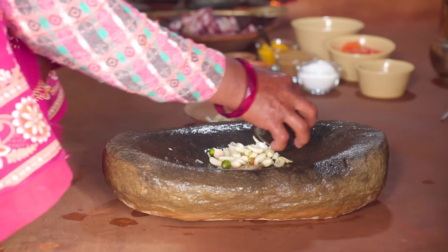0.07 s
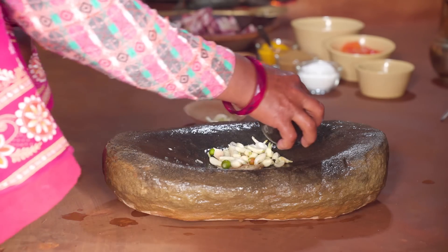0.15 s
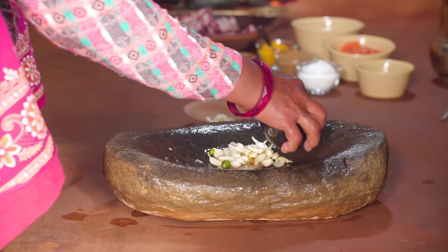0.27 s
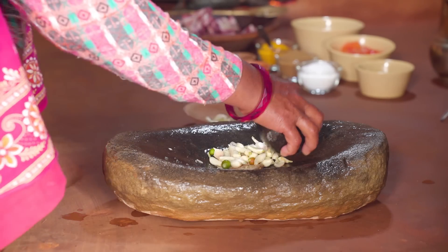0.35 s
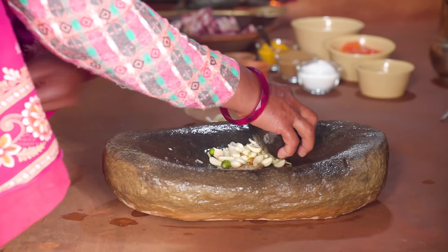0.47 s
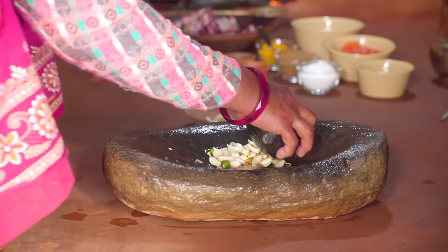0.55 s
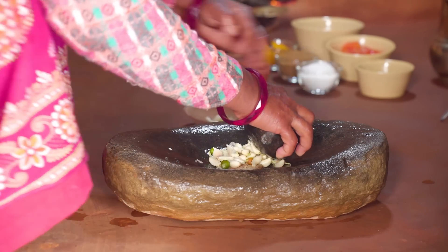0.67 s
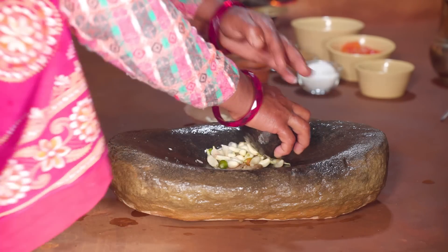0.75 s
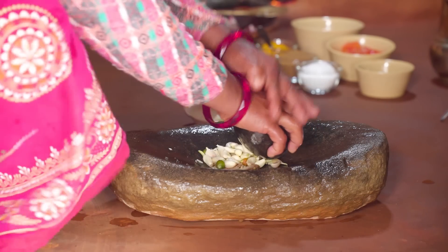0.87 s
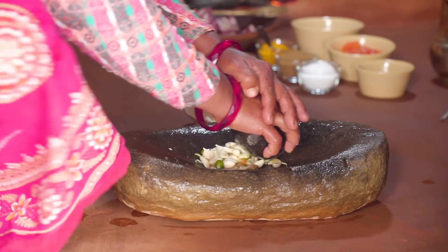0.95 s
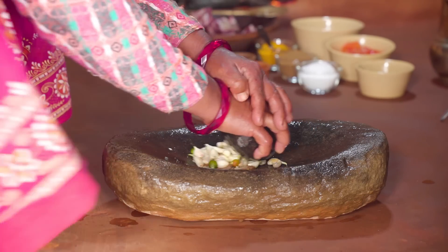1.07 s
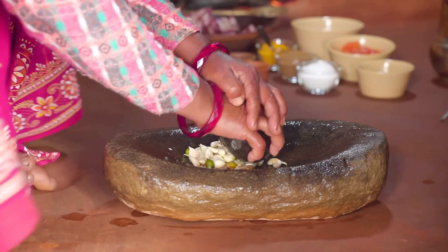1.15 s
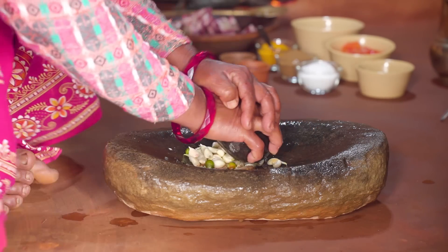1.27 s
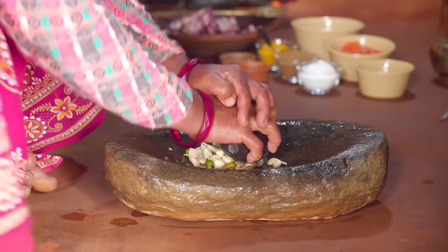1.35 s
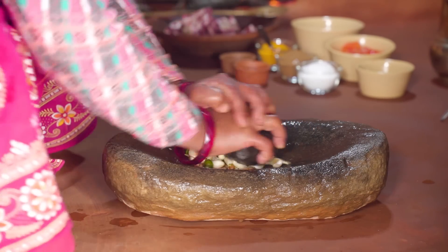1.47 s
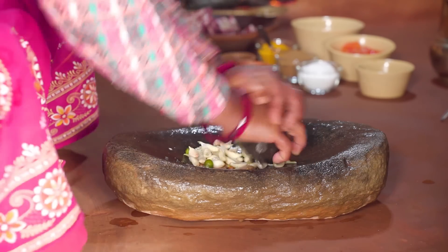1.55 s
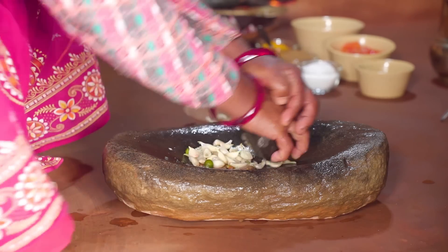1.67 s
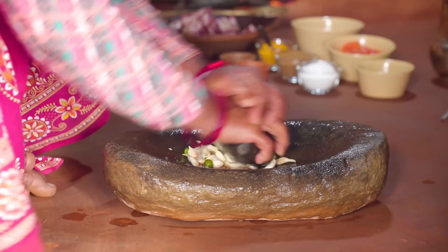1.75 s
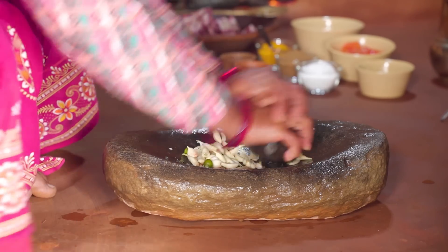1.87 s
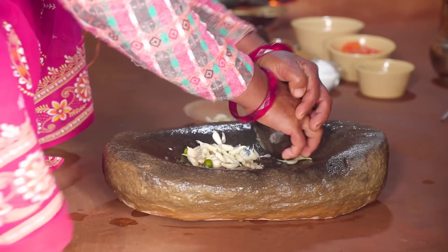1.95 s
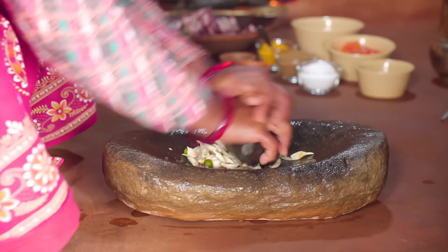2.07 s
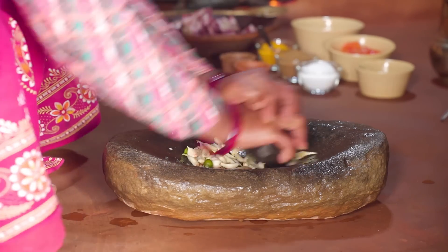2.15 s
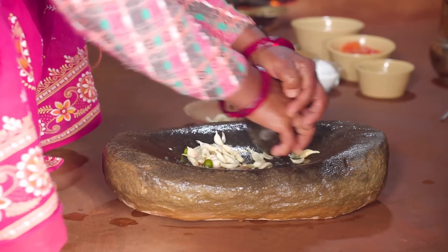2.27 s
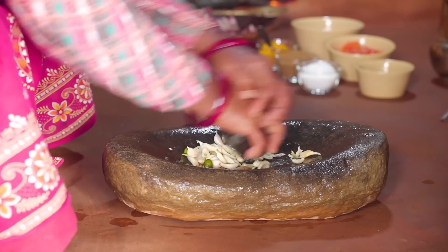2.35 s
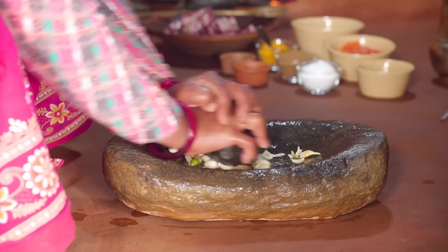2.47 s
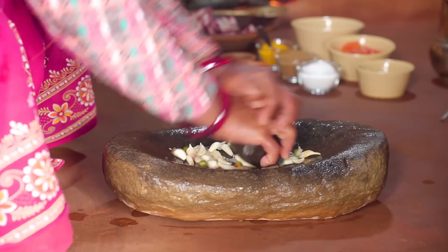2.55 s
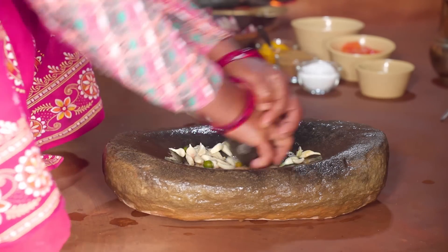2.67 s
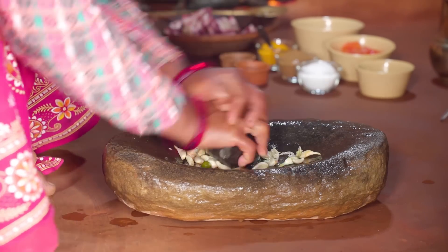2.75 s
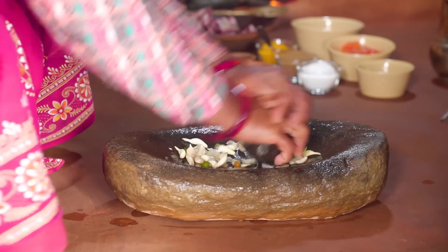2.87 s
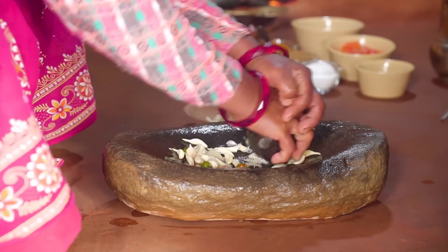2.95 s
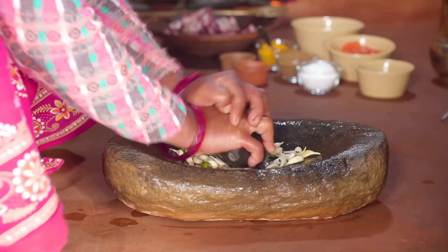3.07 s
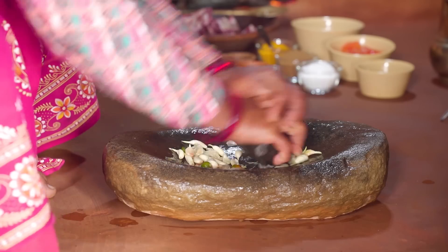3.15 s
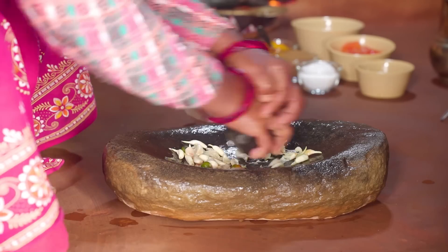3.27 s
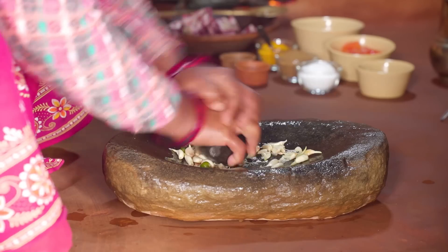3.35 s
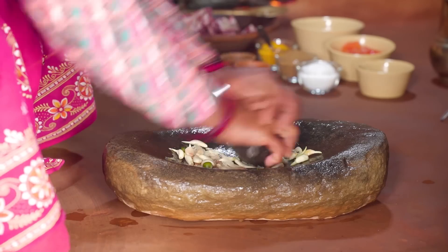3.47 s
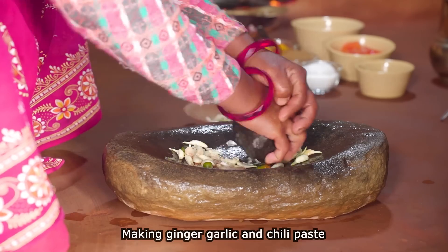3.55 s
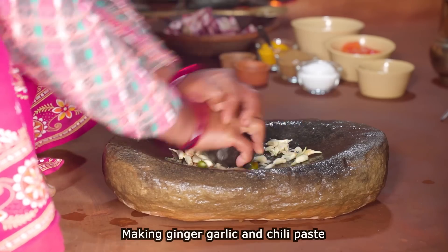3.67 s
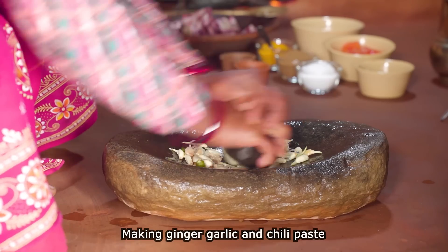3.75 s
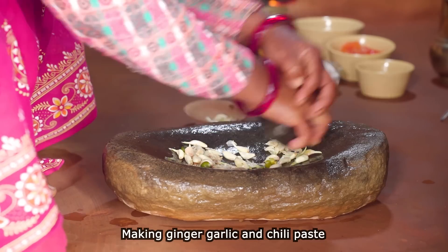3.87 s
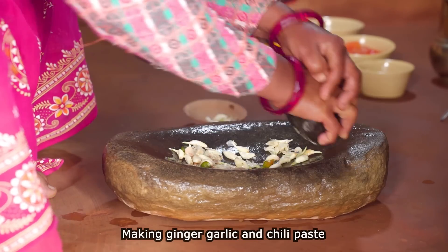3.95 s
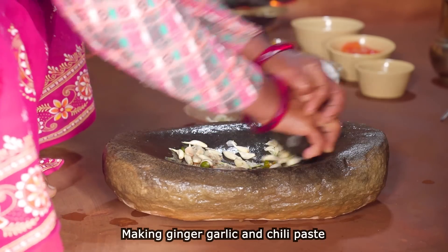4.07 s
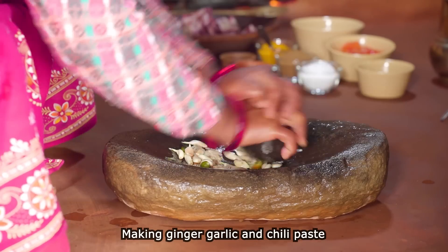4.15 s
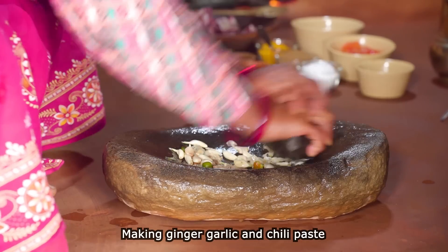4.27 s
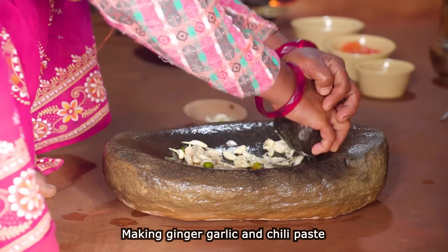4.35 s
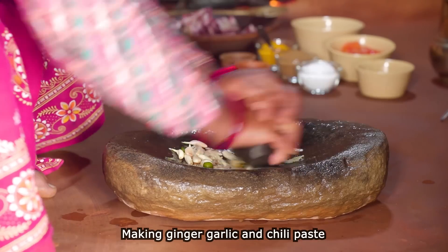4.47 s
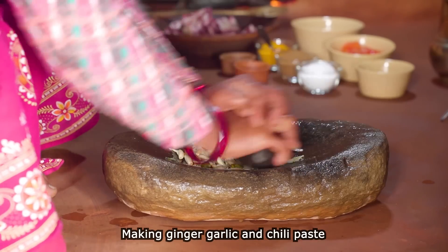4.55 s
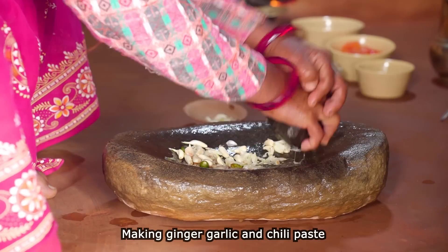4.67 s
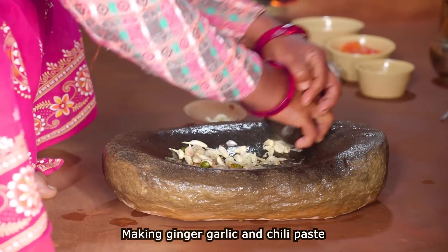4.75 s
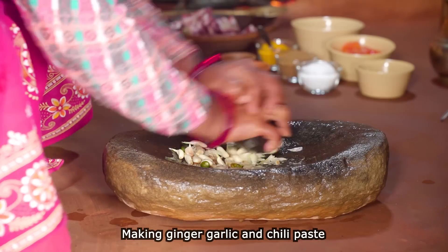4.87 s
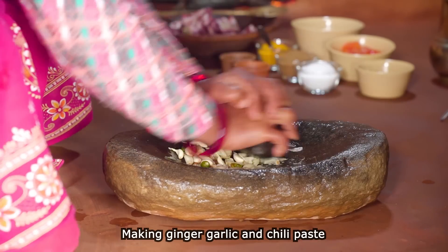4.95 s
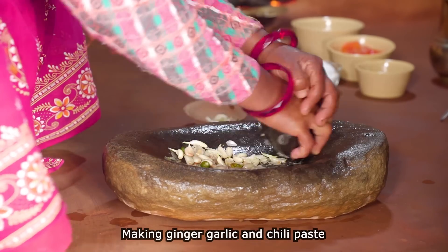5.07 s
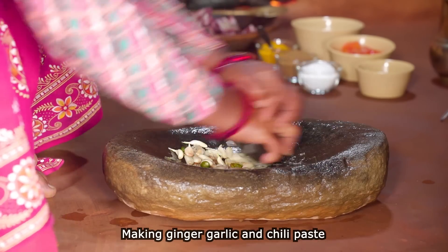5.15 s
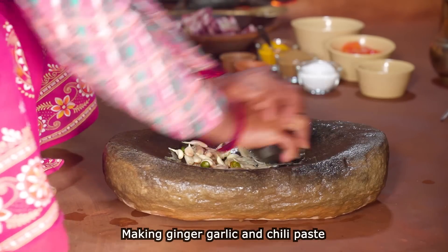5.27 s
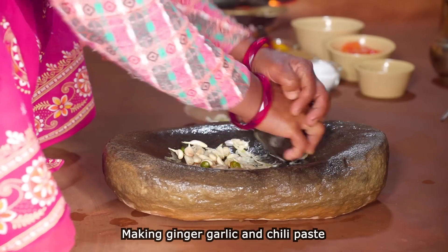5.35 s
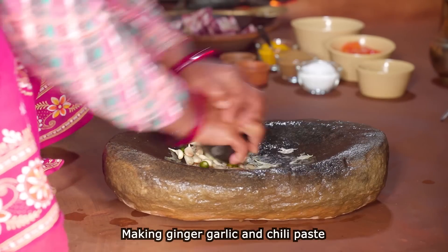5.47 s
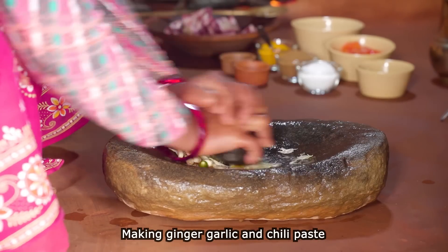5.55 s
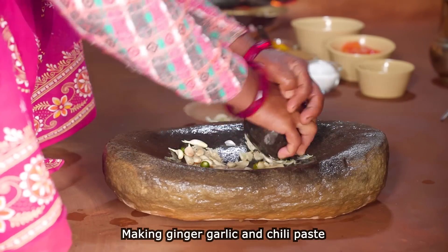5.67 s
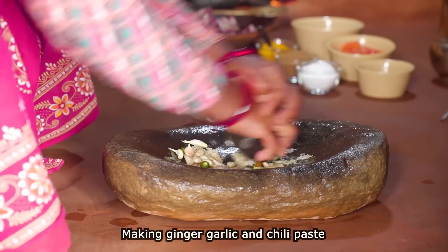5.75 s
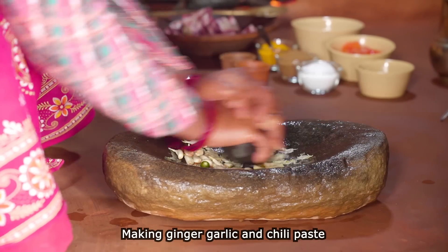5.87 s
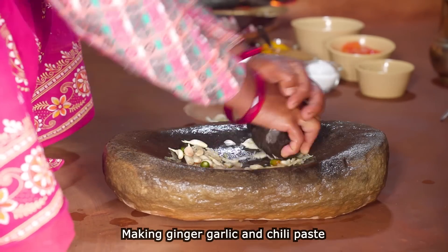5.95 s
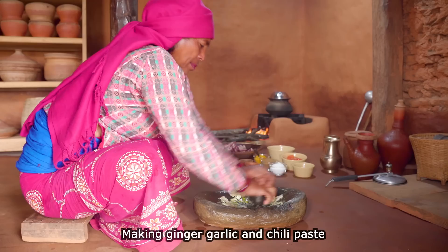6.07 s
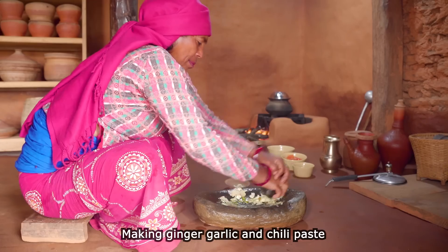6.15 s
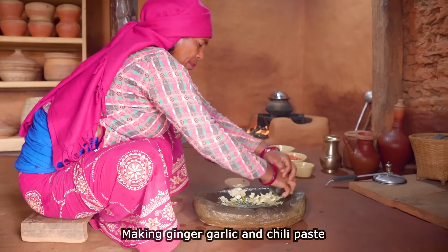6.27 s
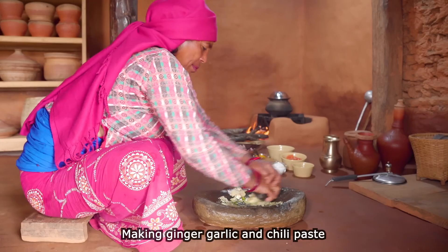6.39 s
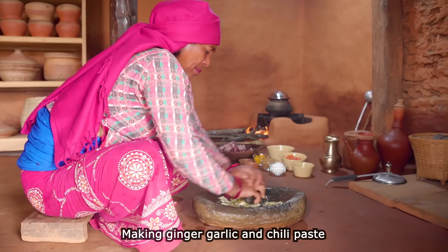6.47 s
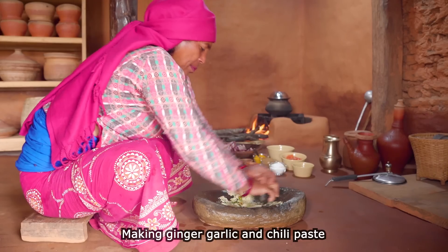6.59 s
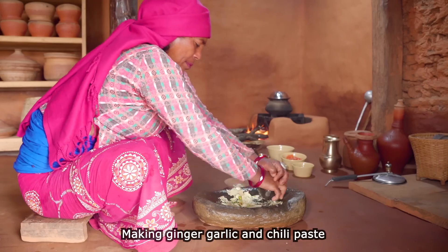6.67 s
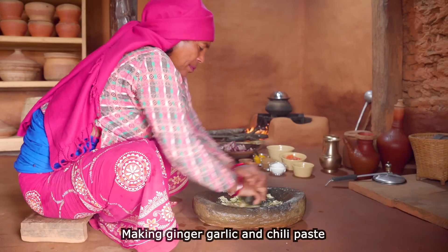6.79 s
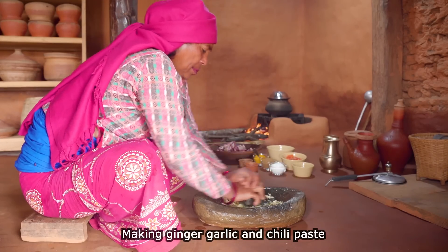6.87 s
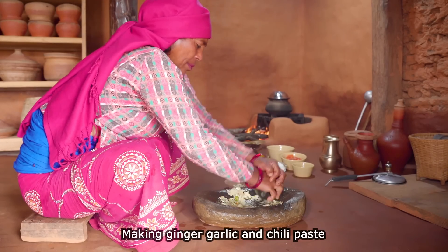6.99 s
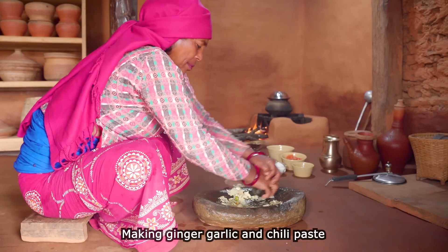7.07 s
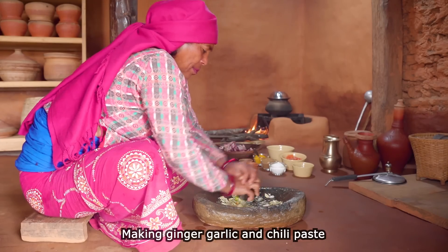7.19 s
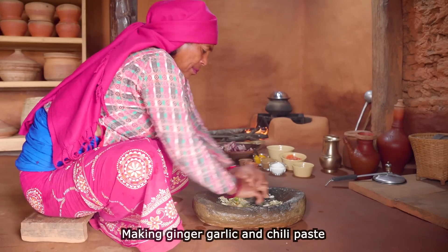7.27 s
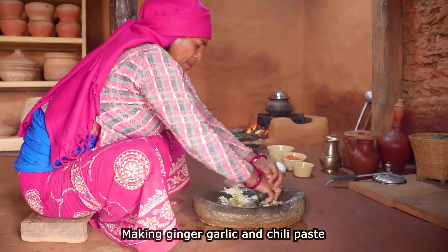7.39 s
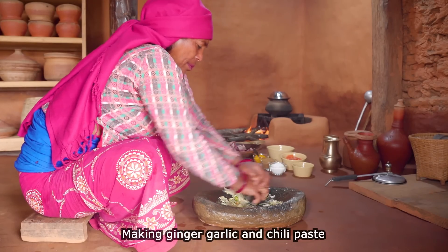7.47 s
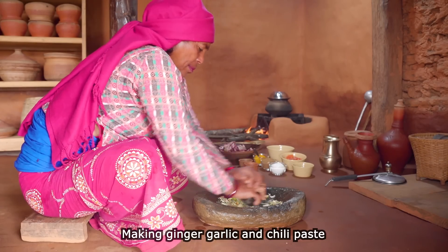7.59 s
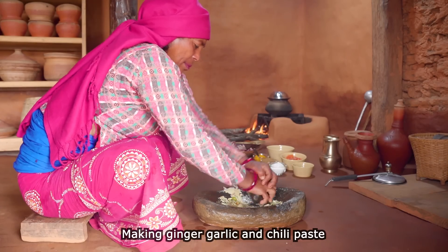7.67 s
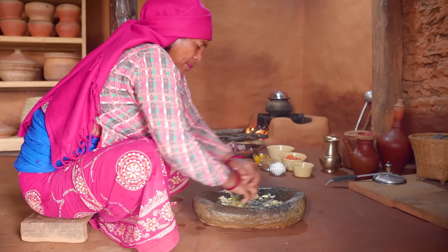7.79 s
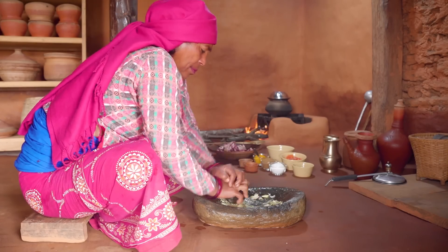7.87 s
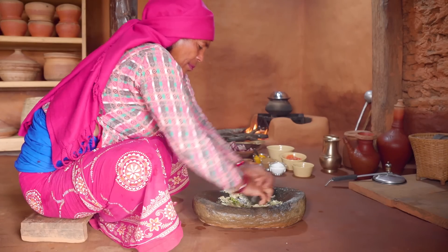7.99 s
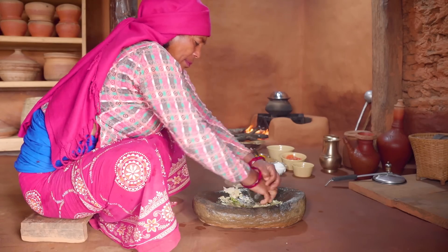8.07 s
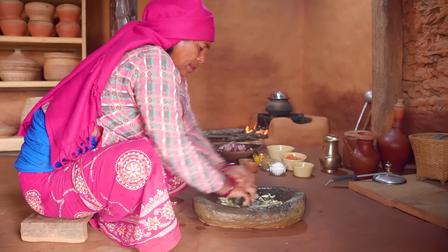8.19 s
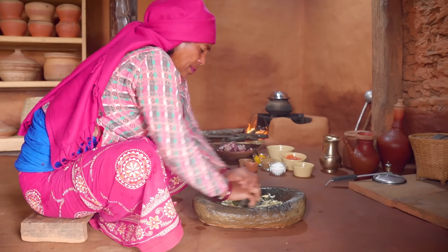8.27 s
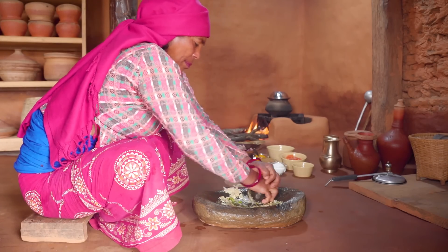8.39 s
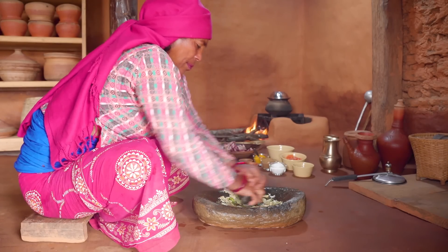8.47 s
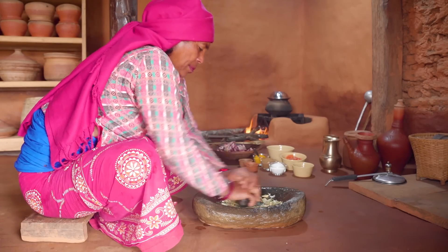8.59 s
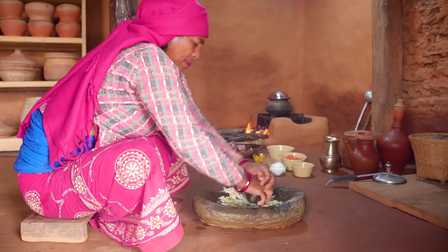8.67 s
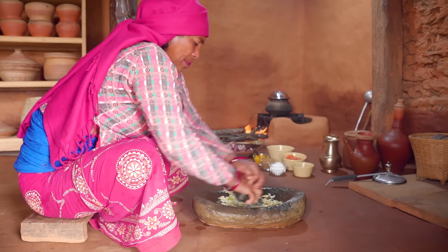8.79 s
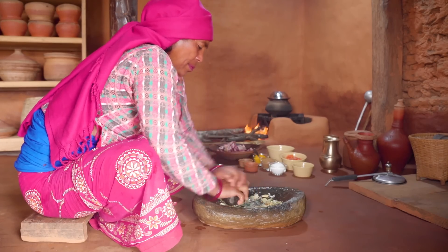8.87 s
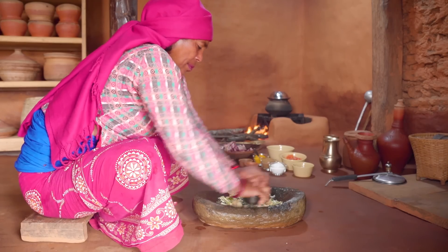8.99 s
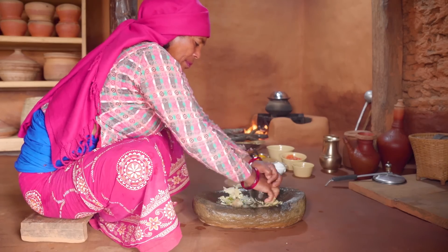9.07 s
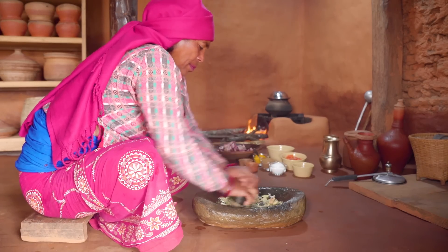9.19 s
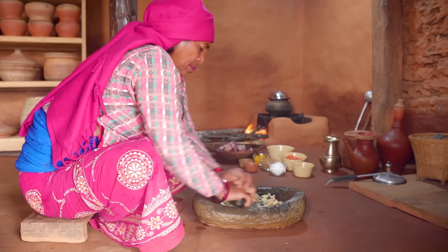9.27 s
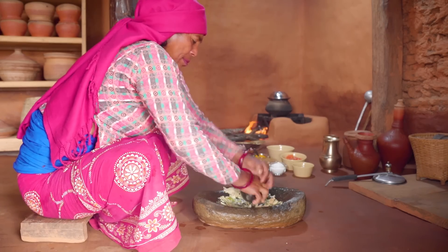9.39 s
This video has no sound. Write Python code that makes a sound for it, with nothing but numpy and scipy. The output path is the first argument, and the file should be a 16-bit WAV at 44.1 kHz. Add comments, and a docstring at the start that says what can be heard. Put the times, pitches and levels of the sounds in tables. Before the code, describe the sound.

Soft cloth rustle and a few faint ticks come first. Then a hand stone starts crushing garlic, ginger and chili on a stone slab, about three strokes a second. Each stroke is a wet crunch with a little gritty grinding, and firm pieces snap crisply. Now and then stone knocks on stone. It sounds close, in a small kitchen with short reflections and a faint hiss.

```python
"""A hand stone rocks over garlic, ginger and chili on a flat stone slab in a small earthen kitchen.
Soft cloth rustle and handling noise fill the first 1.4 s. Then each stroke bursts wet plant cells
and grinds grit; firm pieces snap, and now and then stone knocks dully on stone.
Walls and floor answer closely. A few faint squeaks and a steady hiss lie underneath."""
import sys
import numpy as np
from scipy import signal
from scipy.fft import rfft, irfft
from scipy.io import wavfile

SR = 44100
rng = np.random.default_rng(int(sys.argv[2]) if len(sys.argv) > 2 else 0)


def inscribe(sig):
    """Save sig as 16-bit PCM at rate SR to the path in sys.argv[1].

    A 1-D sig is mono; a 2-D sig holds one channel per row.
    Samples are clipped to [-1, 1] before scaling.
    """
    pcm = np.round(np.clip(np.atleast_2d(sig).T, -1, 1) * 32767)
    wavfile.write(sys.argv[1], SR, pcm.astype(np.int16))


N = 415863
TIME_S = np.arange(N) / SR

# Spectra of bursting cells, juice and grit: freq_hz, density_db
CRUNCH_SPECTRUM = [(200, -54), (700, -30.5), (1500, -12.5), (2000, -17), (2600, -4.5), (3400, -6.5),
                   (4400, -2.5), (5700, -2), (6900, -5.5), (9000, -8.5), (16000, -16.5)]
JUICE_SPECTRUM = [(1500, -43.5), (5000, -6), (7800, 3.5), (10000, -2), (12000, -9.5), (14000, -10.5),
                  (16000, -11.5)]
GRIND_SPECTRUM = [(100, -28.5), (350, -23.5), (600, -11), (850, 3.5), (1200, -3.5), (1800, 5), (2600, -0.5),
                  (5000, -44)]
# Soft cloth rustle and handling noise (first three rows), then hand stone strokes; before mix gains:
# full_level_s, hold_s, crunch_db, rise_s, juice_re_crunch_db, grind_db
RUSTLES_AND_STROKES = [(0.0, 0.1, -66.5, .1, -3, -67), (0.715, .17, -63.5, 0.087, -4, -62),
                       (1.13, 0.15, -62, 0.45, -1, -57), (1.48, 0.022, -51.5, 0.041, 1, -50),
                       (1.538, 0.033, -36.5, 0.065, -6, -55.5), (1.82, 0.017, -53.5, 0.13, 1, -73),
                       (1.89, 0.041, -40.5, .04, -1, -59.5), (2.185, 0.062, -47.5, 0.13, -1, -68),
                       (2.519, 0.069, -45, 0.054, -3.5, -66), (2.755, 0.033, -58.5, 0.056, -2, -82),
                       (2.86, 0.061, -40.5, 0.051, -7, -48.5), (3.17, 0.038, -48, 0.11, -9, -54.5),
                       (3.48, 0.036, -44.5, 0.061, -6, -55.5), (3.679, 0.06, -56, .03, -1, -69),
                       (3.78, 0.049, -47.5, .08, -3, -67), (4.19, 0.17, -55, 0.11, -14, -59),
                       (4.55, 0.086, -46.5, 0.063, 2, -52), (5.024, 0.018, -44.5, 0.12, 12, -76),
                       (5.248, 0.09, -48.5, 0.096, -3, -55), (5.6, 0.068, -45, 0.067, -5, -61.5),
                       (5.865, .11, -47, 0.12, -4, -61), (6.125, 0.02, -55, 0.13, 8, -58.5),
                       (6.45, .05, -57.5, 0.13, -4, -66), (6.6, 0.057, -50.5, 0.21, -9, -61.5),
                       (6.89, 0.085, -49, .11, -4, -59.5), (7.265, 0.1, -51.5, 0.053, -3, -59),
                       (7.6, 0.087, -54, .16, 0, -57.5), (7.97, 0.065, -45, 0.065, -2, -55.5),
                       (8.291, 0.093, -48, 0.16, -11, -52), (8.655, 0.034, -51, 0.27, -2, -60.5),
                       (9.0, 0.062, -51.5, 0.078, 1, -65), (9.28, 0.095, -49, .12, -1, -58.5)]

def rustle_and_crushing():
    """Cloth rustle and handling noise at first; then strokes burst cells, spray juice and grind grit."""
    crunch_db, juice_db, grind_db = gesture_levels(RUSTLES_AND_STROKES)
    cells = grains(rate_hz=5000, spread_db=3.3, clump_db=4)
    droplets = grains(rate_hz=5000, spread_db=4, clump_db=4)
    grit = grains(rate_hz=3600, spread_db=4, clump_db=9) * from_db(grind_db)
    bursting = cells * from_db(crunch_db)
    spray = (.68 * cells + 1.1 * droplets) * from_db(crunch_db + juice_db)
    crunch = colour(bursting, CRUNCH_SPECTRUM)
    ring = stones(butter(bursting, 3400, "high", order=3), ring_db=6)  # small fractures: high modes
    juice = colour(spray, JUICE_SPECTRUM)
    grind = colour(grit, GRIND_SPECTRUM) + from_db(-6.5) * stones(grit, ring_db=-1.5)
    return from_db(1.85) * crunch + from_db(-12) * ring + from_db(-1) * juice + from_db(-6.5) * grind


def gesture_levels(gestures, size=2000):
    """Crunch, juice and grind in dB: the strongest gesture leads; squashed pulp crackles on, wetter."""
    rest_db = [-75, -81, -74.5]  # stone shifting on the pulp between strokes
    usual_crunch_db, usual_crackle_db, crackle_share = -48, -62, .22
    crackle_wetness_db, swell_db_per_s = 5, 58
    grind_lag_s = .013
    t = np.linspace(0, N / SR, size)
    levels_db = np.outer(rest_db, np.ones(size))
    for full_s, hold_s, crunch_db, rise_s, juice_db, grind_db in gestures:
        press_db, relax_db = pressure(t, full_s, hold_s, rise_s)
        lagged_db, _ = pressure(t - grind_lag_s, full_s, hold_s, rise_s)
        crush_db = crunch_db + press_db
        crackle_peak_db = usual_crackle_db + crackle_share * (crunch_db - usual_crunch_db)
        crackle_db = min(crunch_db, crackle_peak_db) + relax_db
        cushion_db = swell_db_per_s * np.clip(full_s + hold_s - t, 0, hold_s)  # thin pulp grinds harder
        gesture_db = [np.maximum(crush_db, crackle_db),
                      juice_db + np.maximum(crush_db, crackle_db + crackle_wetness_db),
                      grind_db - cushion_db + lagged_db]
        levels_db = np.maximum(levels_db, gesture_db)
    return [np.interp(TIME_S, t, level_db) for level_db in levels_db]


def pressure(t, full_s, hold_s, rise_s):
    """Two envelopes in dB re full pressure: the hand lets go fast, the pulp relaxes slowly."""
    bear_down_db, release_db_per_s, relax_db_per_s = 20, 315, 75
    early_s = np.maximum(full_s - t, 0)
    late_s = np.maximum(t - full_s - hold_s, 0)
    rise_db = -bear_down_db * early_s / max(rise_s, .01)
    return rise_db - release_db_per_s * late_s, rise_db - relax_db_per_s * late_s


# Faint handling ticks before 1.4 s, then firm pieces breaking; before mix gain:
# break_s, level_db, pitch_hz, splinter_re_crack_db, jolt_re_crack_db, tear_s
TICKS_AND_SNAPS = [(0.293, -67, 6500, 10, 6, .0011), (0.531, -65.5, 6500, 8, -18, 0.0029),
                   (0.9784, -64.5, 6500, 7, -19, 0.00067), (1.026, -64.5, 6450, 5, -19, .001),
                   (1.348, -56.5, 6550, 9, -27, 0.0023), (1.4955, -46.5, 4520, -0.5, -17, 0.00089),
                   (1.5471, -39, 4160, -6, -11, 0.0038), (1.5724, -34.5, 5070, -15, -16, 0.00079),
                   (1.5978, -41.5, 5000, 0, -32, .001), (1.884, -44, 5500, 2, -14, 0.00081),
                   (1.9096, -40, 5540, -5.5, -26, 0.00077), (2.4711, -45.5, 6000, 1.5, -10.5, 0.0023),
                   (2.5153, -35, 6660, 1, -7, 0.00033), (2.5803, -26, 4980, -10, -21, 0.00029),
                   (2.8202, -30, 4400, -5.5, -13.5, 0.00026), (3.108, -53, 4250, 0, -25, 0.0046),
                   (3.157, -39, 7000, -1, -8, .0013), (3.414, -58.5, 5500, 0, -8, 0.0032),
                   (3.4697, -37, 4870, -.5, -8.5, 0.00086), (3.5264, -45.5, 5830, 2.5, -17, .0017),
                   (3.7703, -33, 6700, -2, -13, 0.001), (4.2436, -50, 4500, -4, -25, 0.0014),
                   (4.284, -46, 5550, 0, -31, 0.0012), (4.306, -38, 6400, -1, -18.5, 0.0024),
                   (4.586, -31.5, 6600, 2, -2, 0.0013), (4.6, -39.5, 4000, -21, -18, 0.0081),
                   (4.8613, -46.5, 6160, .5, -19, 0.003), (4.948, -49.5, 5130, 0, -21, .0017),
                   (5.3163, -48, 4220, -6, -22, 0.004), (5.462, -47, 6900, 1.5, -38, 0.0044),
                   (5.5404, -50.5, 5300, -3.5, -12, 0.0023), (5.5907, -36, 4500, 2.5, 0, 0.0017),
                   (5.6204, -34.5, 4160, -31, -31, .0008), (6.5327, -48.5, 3230, -8, -30, .005),
                   (6.894, -48, 4700, -3, -19, 0.0041), (6.9334, -44, 5870, 2, -8.5, 0.0023),
                   (6.981, -56.5, 4840, -4, -24, 0.0003), (7.582, -49.5, 5000, -6, -12, 0.00079),
                   (7.601, -50, 6050, -6.5, -25, 0.0026), (7.785, -65.5, 3070, 1, -3, 0.0017),
                   (7.8983, -47.5, 4340, -7.5, -25, 0.0062), (7.9518, -44, 3100, -5.5, 0, 0.00068),
                   (7.9654, -40.5, 3830, -1.5, -1.5, 0.00064), (8.3079, -28, 6460, 2.5, -5, 0.00068),
                   (8.642, -48.5, 5830, -20, -7, .0012), (8.919, -55, 7100, 3.5, -11, 0.0015),
                   (9.0258, -41.5, 5040, -32, -36, 0.0074), (9.3147, -40, 4500, -5, -6, 0.00032)]

def snaps():
    """After the opening ticks, firm pieces strain, crack at a pitch set by size and jolt the stones."""
    out = np.zeros(N)
    lead_samples = 800
    before_s = np.arange(-lead_samples, 0) / SR
    for break_s, level_db, pitch_hz, splinter_db, jolt_db, tear_s in TICKS_AND_SNAPS:
        # Slow tears build slowly; brittle pieces break without warning.
        strain = unit_energy(rng.standard_normal(lead_samples) * np.exp(before_s / (1.3 * tear_s)))
        force = np.concatenate([from_db(-11.5) * strain, burst(tear_s, flurry_db=8)])
        band_hz = [.62 * min(pitch_hz, 5500), 1.25 * min(pitch_hz, 6500)]
        crack = unit_energy(butter(force, band_hz, "band"))
        splinters = from_db(splinter_db) * unit_energy(colour(force, JUICE_SPECTRUM))
        jolt = from_db(jolt_db) * unit_energy(stones(butter(force, 1190, "high"), ring_db=9.5))
        add(out, break_s - lead_samples / SR, at_level(crack + splinters + jolt, level_db))
    return out


# Stone on stone: start_s, level_db, hardness_hz, settle_s, tick_re_knock_db
STONE_KNOCKS = [(0.709, -54.5, 3020, 0.019, -20), (2.213, -48, 2290, 0.034, -25),
                (2.919, -44, 970, 0.0033, -32), (3.214, -61, 970, 0.01, -29),
                (4.088, -26.5, 1970, 0.011, -44), (4.485, -27.5, 1953, 0.0057, -36),
                (4.9581, -25.5, 1930, 0.0019, -26), (5.073, -57, 684, 0.0097, -28),
                (5.129, -55.5, 1630, 0.02, 2), (5.177, -46.5, 850, 0.0065, -35),
                (5.359, -54, 1190, 0.0097, -25), (5.928, -55, 950, 0.0072, -30),
                (6.364, -29, 1900, 0.005, -30.5), (7.188, -32, 1910, 0.0041, -21.5),
                (7.375, -61.5, 955, 0.0022, -23)]

def knocks():
    """The hand stone pinches the pulp, lands and settles; more pulp makes a softer, duller contact."""
    out = np.zeros(N)
    for start_s, level_db, hardness_hz, settle_s, tick_db in STONE_KNOCKS:
        contact = burst(settle_s, flurry_db=8, size=8192)
        force = butter(contact, 1.194 * hardness_hz, "low", order=5)
        pulp_tick = colour(burst(decay_s=.004, flurry_db=-4), JUICE_SPECTRUM)
        add(out, start_s, at_level(stones(force, ring_db=-7.5), level_db))
        add(out, start_s - .001, at_level(pulp_tick, level_db + tick_db))
    return out


# Stone resonances: freq_hz, relative_db
RING_MODES = [(527, -20.5), (727, -18.5), (840, -1), (943, -13.5), (1040, -9.5), (1090, -11.5), (1213, -12),
              (1475, -21.5), (1768, 8), (1926, 4), (2060, -3), (2288, 6), (2615, -2.5), (2720, 4.5),
              (4060, -17), (4350, 10.5), (5207, -20.5), (8380, -2.5)]
# Contact clack: freq_hz, density_db
CLACK_SPECTRUM = [(40, -56.5), (130, -36.5), (280, -38.5), (420, -20), (560, -14), (760, -4.5), (980, 1),
                  (1400, -2), (1800, 3.5), (2800, 1), (4500, -6.5), (9000, -35.5)]

def stones(force, ring_db, t60_s=.066, size=8192):
    """Slab and hand stone answer a force with a clack and a ring; hand and pulp damp all modes alike."""
    t = np.arange(size) / SR
    modes = sum((-1) ** k * from_db(db) * np.sin(2 * np.pi * hz * t)
                for k, (hz, db) in enumerate(RING_MODES))
    ring = unit_energy(modes * from_db(-60 * t / t60_s))
    return colour(force, CLACK_SPECTRUM) + from_db(ring_db) * convolve(force, ring)


# Faint squeaks: start_s, length_s, pitch_hz, level_db, waver_share
FAINT_SQUEAKS = [(1.315, .03, 2400, -68, .03), (7.075, .025, 3400, -67, .05), (8.0, .2, 692, -69.5, .015),
                 (8.108, .05, 2200, -65, .09)]

def squeaks():
    """Short, wavering notes that swell and fade."""
    out = np.zeros(N)
    for start_s, length_s, pitch_hz, level_db, waver_share in FAINT_SQUEAKS:
        progress = np.clip((TIME_S - start_s) / length_s, 0, 1)
        swell = np.sqrt(np.sin(np.pi * progress).clip(0))
        wavering_hz = pitch_hz * (1 + waver_share * drift(pitch_hz / 6))
        phase = 2 * np.pi * np.cumsum(wavering_hz) / SR
        out += from_db(level_db + 3 * drift(40)) * swell * np.sin(phase)
    return out


def kitchen(direct, tail_db, build_s, spots):
    """Direct sound plus reflections, which change as the hand travels over the slab."""
    travel_hz = 1.3
    place = (spots - 1) * (.5 + .5 * np.sin(2 * np.pi * travel_hz * TIME_S + drift(3)))
    wet, energy = np.zeros((2, N)), 0
    for spot in range(spots):
        response = reflections(tail_db, build_s)
        nearness = np.sqrt(np.clip(1 - np.abs(place - spot), 0, 1))
        wet += [convolve(direct * nearness, side) for side in response]
        energy += np.sum(response ** 2) / (2 * spots)
    return (direct + wet) / np.sqrt(1 + energy)


# Room decay: freq_hz, t60_s
KITCHEN_DECAY = [(200, 0.48), (900, 0.1936), (2000, 0.2233), (3500, 0.16), (7000, 0.1857), (15000, 0.28)]
# Near surfaces: delay_s, gain_db
NEAR_ECHOES = [(.0052, -10), (.0064, -13), (.0085, -6), (0.0132, -6), (0.0164, -18)]

def reflections(tail_db, build_s, size=14000):
    """Stereo room response to one spot: near echoes and a dense tail that dies band by band."""
    onset = 1 - np.exp(-np.arange(size) / SR / build_s)
    freq_hz, frame_s, bands = signal.stft(stereo_noise(size), SR, nperseg=256)
    decay = from_db(-60 * frame_s / at_hz(KITCHEN_DECAY, freq_hz)[:, None])
    tail = signal.istft(bands * decay, SR)[1][:, :size]
    response = np.array([from_db(tail_db) * unit_energy(side * onset) for side in tail])
    for delay_s, gain_db in NEAR_ECHOES:
        spot_offset_s = rng.normal(0, .0004)
        side_offsets_s = rng.normal(0, .00006, 2)
        arrival_s = np.abs(delay_s + spot_offset_s + side_offsets_s)
        response[[0, 1], (arrival_s * SR).astype(int)] += from_db(gain_db)
    return response


# Background hiss: freq_hz, density_db
HISS_SPECTRUM = [(18, -61), (30, -25), (112, -18.5), (384, -10), (721, -1.5), (1010, 2), (6210, -15),
                 (11100, -9), (14800, -4), (16000, -29.5)]

def hiss(level_db):
    """Steady, broad stereo noise."""
    noise = np.array([colour(side, HISS_SPECTRUM) for side in stereo_noise(N)])
    return from_db(level_db) * unit_rms(noise)


# Left-right likeness: freq_hz, correlation
STEREO_LIKENESS = [(200, 0.91), (700, 0.34), (1500, 0.1), (4000, 0.045), (14000, 0.23)]

def stereo_noise(size):
    """Noise alike on both sides in the bass, mostly independent in the treble."""
    alike = np.clip(at_hz(STEREO_LIKENESS, np.fft.rfftfreq(size, 1 / SR)), 0, 1)
    mid, side = rfft(rng.standard_normal((2, size)))
    return irfft(np.sqrt(1 + alike) * mid + np.sqrt(1 - alike) * side * [[1], [-1]], size)


def grains(rate_hz, spread_db, clump_db):
    """Tiny random clicks in clumps, mostly small, a few large; mean power 1."""
    sizes = from_db(spread_db * np.minimum(rng.exponential(1, N), 5))
    signs = rng.choice([-1, 1], N)
    clumps = from_db(clump_db * np.tanh(drift(220)))
    hits = rng.random(N) < rate_hz / SR
    return unit_rms(sizes * signs * hits * clumps)


def burst(decay_s, flurry_db, size=4096):
    """One sharp break or contact, then a dying flurry of smaller ones."""
    t = np.arange(size) / SR
    flurry = rng.standard_normal(size) * rng.exponential(1, size) * np.exp(-t / decay_s)
    return (t == 0) + from_db(flurry_db) * unit_energy(flurry)


def drift(rate_hz):
    """Smooth random curve, spread near 1."""
    steps = rng.standard_normal(16384)
    return np.interp(TIME_S * rate_hz, np.arange(len(steps)), steps)


def colour(x, spectrum, size=4096):
    """Minimum-phase filter; white noise keeps its power."""
    gain = from_db(at_hz(spectrum, np.fft.rfftfreq(size, 1 / SR)))
    cepstrum = irfft(np.log(gain))
    cepstrum[1:size // 2] *= 2
    cepstrum[size // 2 + 1:] = 0
    response = irfft(np.exp(rfft(cepstrum)))
    return convolve(x, unit_energy(response))


def butter(x, cutoff_hz, kind, order=2):
    return signal.sosfilt(signal.butter(order, cutoff_hz, kind, fs=SR, output="sos"), x + 1e-18)


def convolve(x, response):
    return signal.oaconvolve(x, response)[:len(x)]


def lag(x, samples):
    """Fractional all-pass delay."""
    a = (1 - samples) / (1 + samples)
    return signal.lfilter([a, 1], [1, a], x)


def add(track, start_s, sound):
    start = int(round(start_s * SR))
    track[start:start + len(sound)] += sound[:N - start]


def at_hz(table, freq_hz):
    """Interpolate along log frequency."""
    knots_hz, values = np.transpose(table)
    return np.interp(np.log(freq_hz + 1), np.log(knots_hz), values)


def at_level(x, level_db):
    """Set the level of a sound's energy spread over 20 ms."""
    return unit_energy(x) * from_db(level_db) * np.sqrt(.02 * SR)


def from_db(db):
    return 10 ** (np.asarray(db) / 20)


def unit_rms(x):
    return x / np.sqrt(np.mean(x ** 2) + 1e-20)


def unit_energy(x):
    return x / np.sqrt(np.sum(x ** 2) + 1e-20)


def scene():
    """Rustle, crushing, snaps and knocks in the kitchen, over squeaks and hiss."""
    work = kitchen(rustle_and_crushing() + from_db(3.5) * snaps(), tail_db=1, build_s=.00014, spots=7)
    stone = kitchen(knocks(), tail_db=-.5, build_s=.0005, spots=3)
    mix = work + stone + squeaks()
    mix[0] = lag(mix[0], samples=.47)  # sound reaches the left side later
    return mix + hiss(level_db=-70.6)


def record(dry, low_cut_hz=65, high_cut_hz=15900):
    """Roll off the deep bass and cut the top steeply."""
    steep_lowpass = signal.ellip(10, .2, 70, high_cut_hz, fs=SR, output="sos")
    return signal.sosfilt(steep_lowpass, butter(dry, low_cut_hz, "high"))


dry = scene()
out = record(dry)
inscribe(out)
```